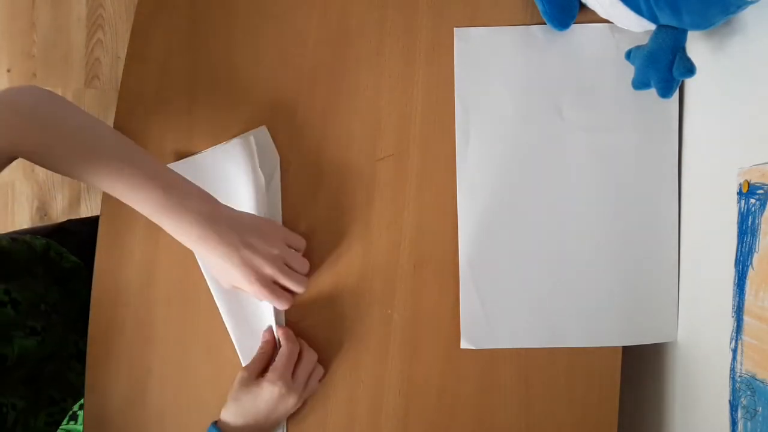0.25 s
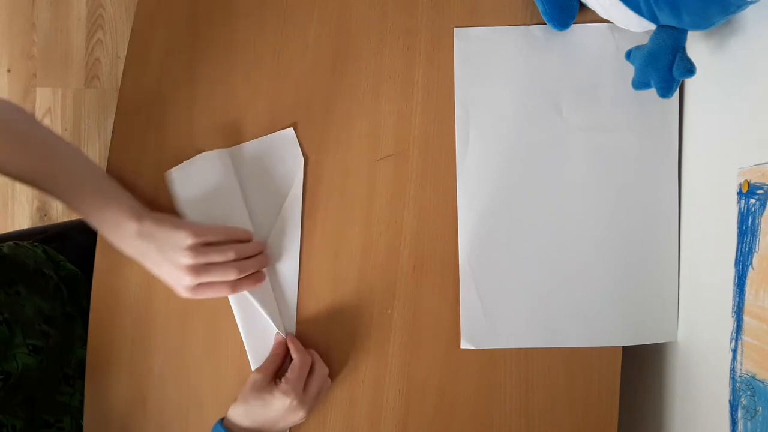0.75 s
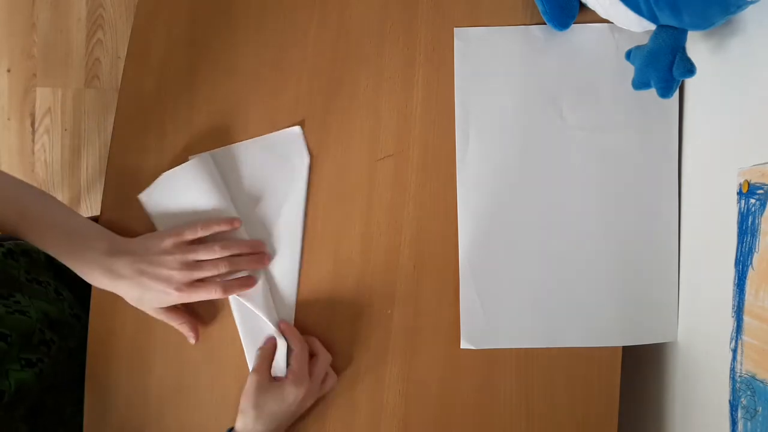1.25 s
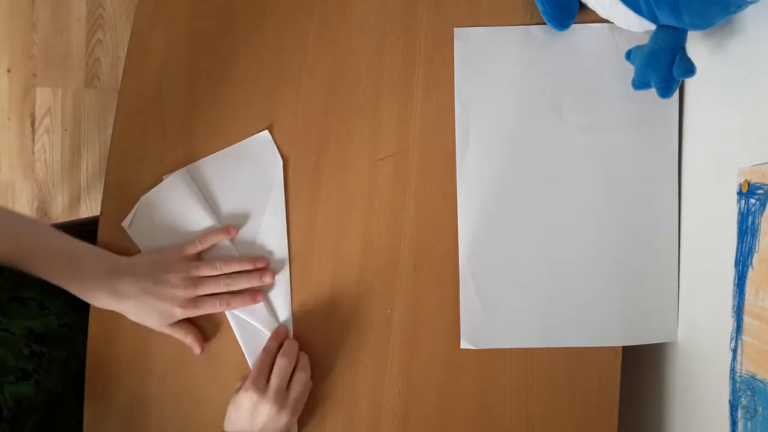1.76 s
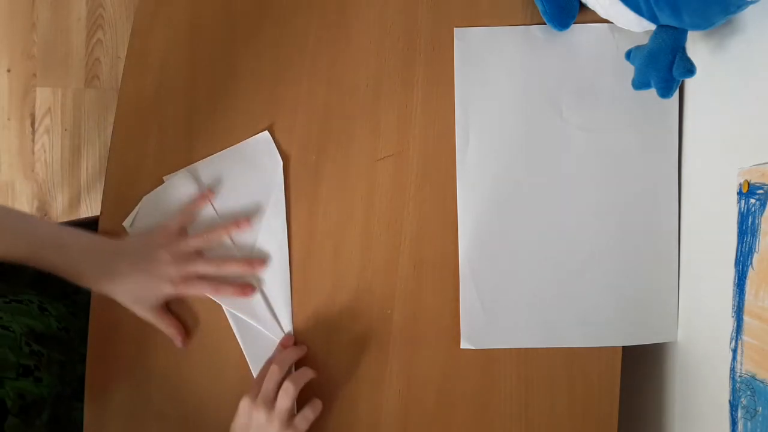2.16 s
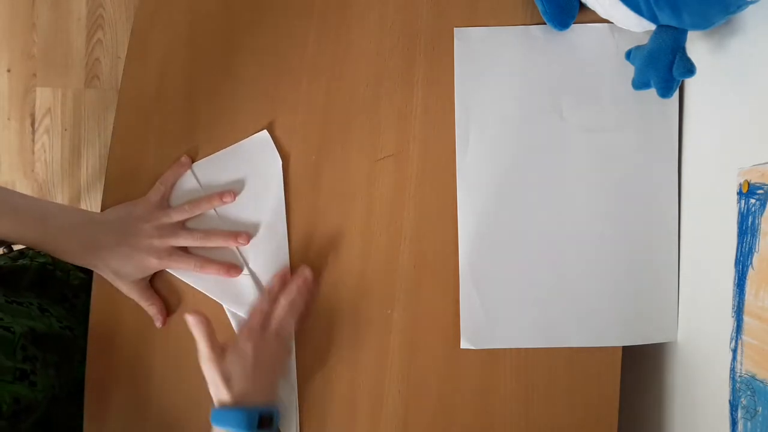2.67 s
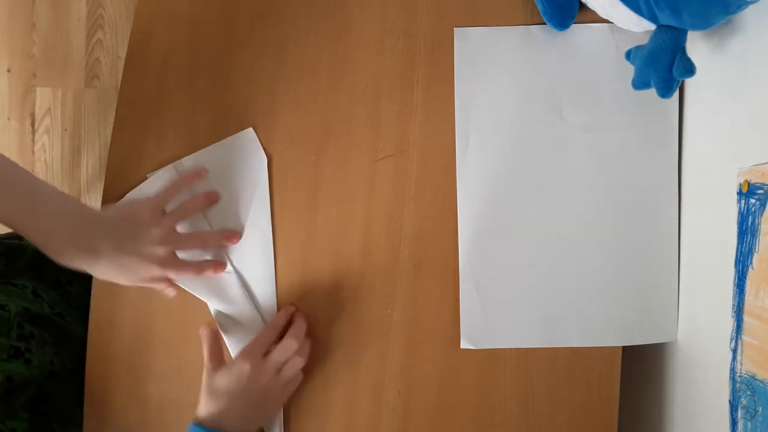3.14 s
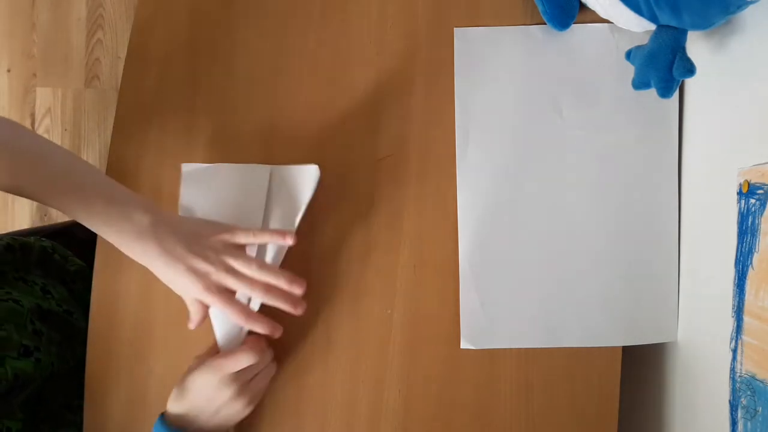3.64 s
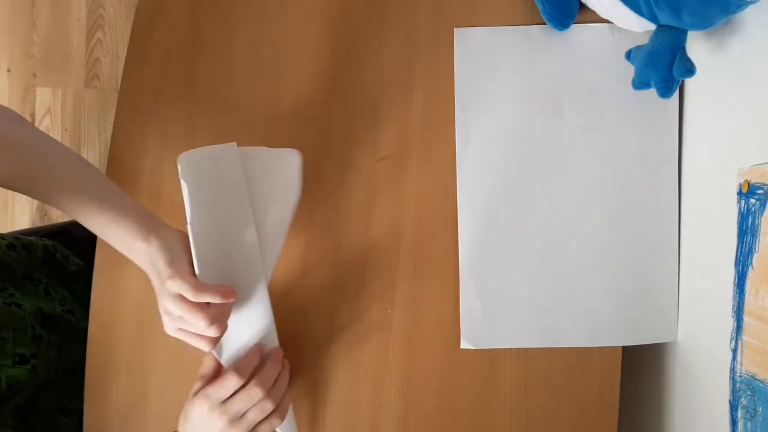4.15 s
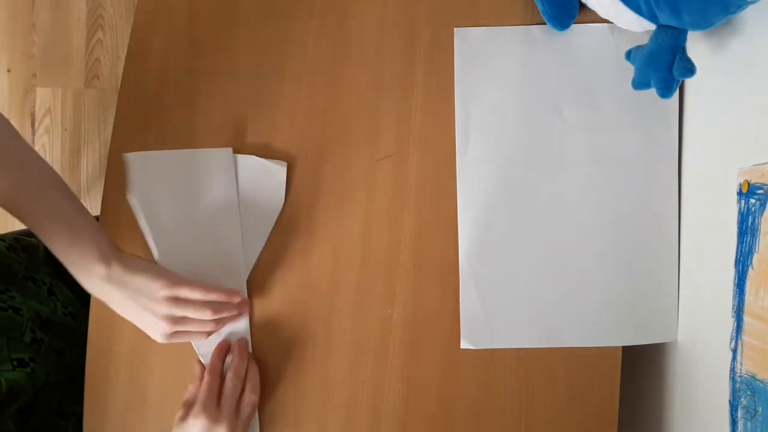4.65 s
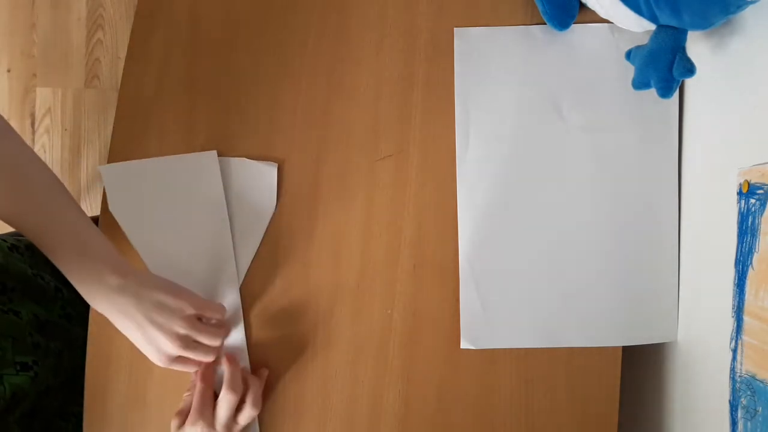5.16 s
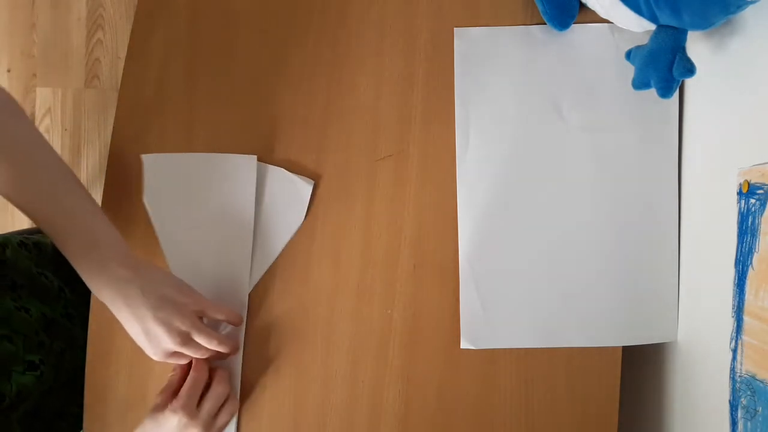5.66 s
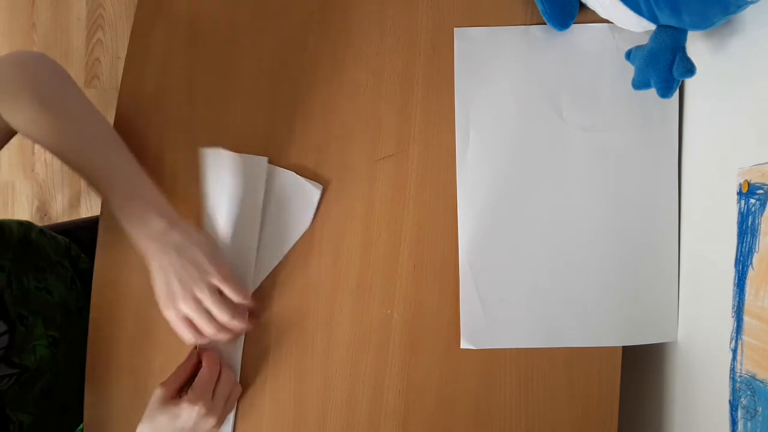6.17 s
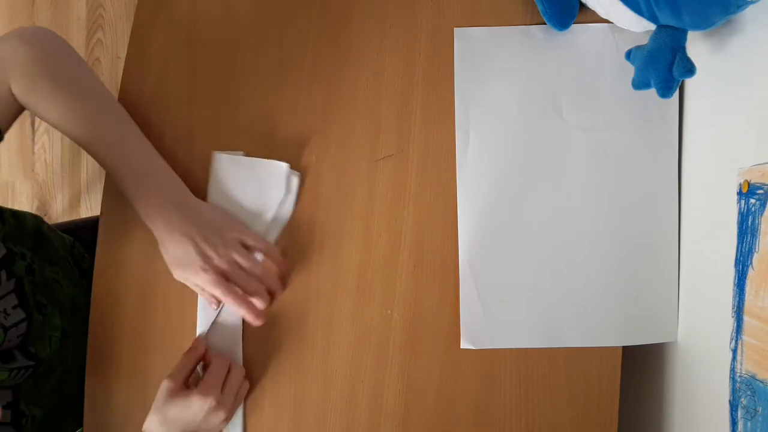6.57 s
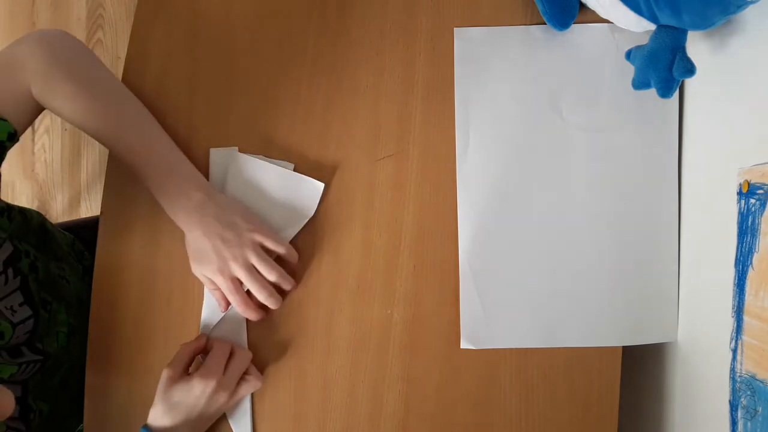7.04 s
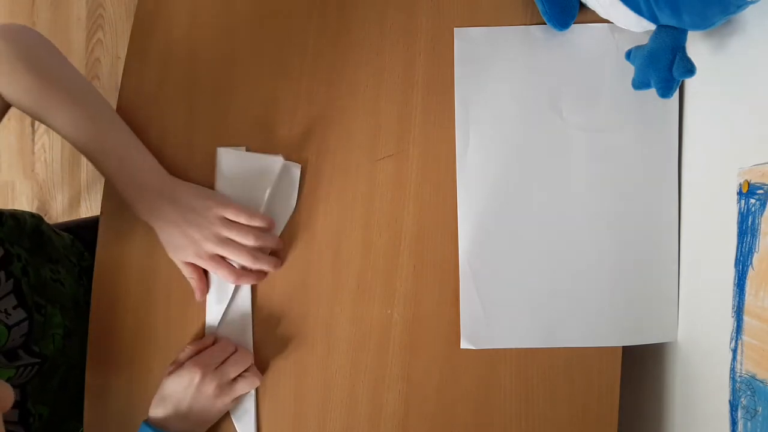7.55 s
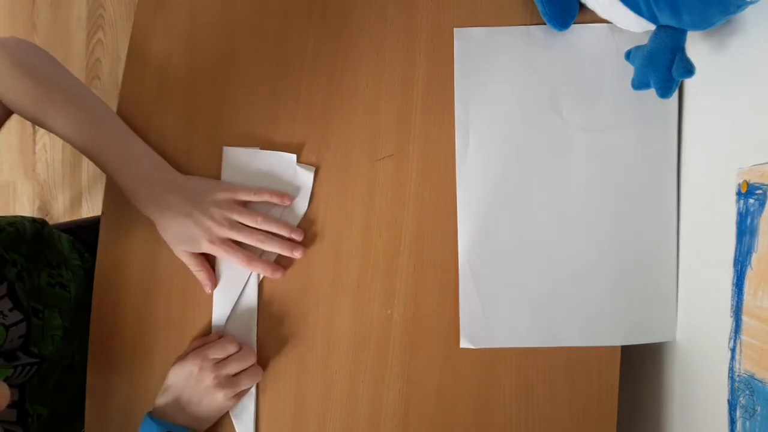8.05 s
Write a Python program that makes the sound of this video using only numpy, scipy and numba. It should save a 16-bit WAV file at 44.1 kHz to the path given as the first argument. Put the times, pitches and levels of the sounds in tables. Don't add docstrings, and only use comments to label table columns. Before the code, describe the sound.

Close paper rustling and creasing: fingers hiss along folds, stiff paper pops and crackles, and hands bump a tabletop in a small room.

```python
import sys
import numpy as np
from scipy import signal
from scipy.fft import rfft, irfft
from scipy.io import wavfile
from scipy.ndimage import uniform_filter1d
from numba import njit

SR = 44100
rng = np.random.default_rng(int(sys.argv[2]) if len(sys.argv) > 2 else 0)


def decibels_to_gain(level_db):
    exponent = np.asarray(level_db, float) / 20
    return 10 ** exponent


def log_audio(samples):
    frames = np.atleast_2d(samples).T
    limited = np.clip(frames, -1, 1)
    pcm = np.round(limited * 32767).astype(np.int16)
    wavfile.write(sys.argv[1], SR, pcm)


N = 366471


def band(x, lo_hz, hi_hz, order=2):
    edges = [lo_hz, min(hi_hz, SR / 2.1)]
    return signal.sosfilt(signal.butter(order, edges, "bandpass", fs=SR, output="sos"), x)


def resonate(x, modes):
    for hz, width_hz, db in modes:
        peak = signal.lfilter(*signal.iirpeak(hz, hz / width_hz, fs=SR), x)
        x = x + (decibels_to_gain(db) - 1) * peak
    return x


@njit
def moving_resonance(x, hz, sharp):
    y, b, l = np.empty(len(x)), 0., 0.
    for i in range(len(x)):
        g = np.tan(np.pi * hz[i] / SR)
        v = (b + g * (x[i] - l)) / (1 + g * (g + 1 / sharp))
        b, l, y[i] = 2 * v - b, l + 2 * g * v, v / sharp
    return y


def ring_each(pushes, hz, sharp):
    pairs = zip(pushes, hz[:, 0])
    return np.array([moving_resonance(row, np.full(len(row), f), sharp) for row, f in pairs])


def unit(x):
    return x / np.sqrt(np.mean(x ** 2))


def peak_unit(x):
    return x / np.abs(x).max(axis=1, keepdims=True)


def walk(rate):
    k = int(SR / rate)
    held = np.repeat(rng.standard_normal(N // k + 1), k)
    return unit(uniform_filter1d(held, k)[:N])


def place(times, shapes):
    out = np.zeros(N + shapes.shape[1])
    for s, shape in zip(times, shapes):
        start = int(s * SR)
        out[start:start + len(shape)] += shape
    return out[:N]


def push_times(s):
    return np.arange(768) * 1000 / SR + 0 * s


def curves(rows):
    s, *columns = np.transpose(rows)
    return [np.interp(np.arange(N) / SR, s, c) for c in columns]


def swells(rows, rest_db, shape=1.365):
    t = np.arange(0, N + 64, 64) / SR
    s, rise, fall, db = np.transpose(rows)[:, :, None]
    before = (s - t) / np.maximum(rise, .003)
    after = (t - s) / np.maximum(fall, .003)
    away = np.where(t < s, before, after)
    power = decibels_to_gain(2 * rest_db) + decibels_to_gain(2 * (db - 20 * away ** shape)).sum(axis=0)
    return np.interp(np.arange(N) / SR, t, 10 * np.log10(power))


# f/Hz, level/dB per Hz
HOUSE_TONE = [
    (13, -6),
    (22, -12),
    (34, -8),
    (48, -2.5),
    (146, -3),
    (547, -29),
    (714, -43),
    (1200, -50),
    (1560, -48),
    (2640, -120),
]


def air():
    f = np.fft.rfftfreq(N, 1 / SR) + 1
    tone_hz, tone_db = np.transpose(HOUSE_TONE)
    db = np.interp(np.log(f), np.log(tone_hz), tone_db)
    hush = irfft(rfft(rng.standard_normal(N)) * decibels_to_gain(db), N)
    return unit(hush) * decibels_to_gain(-72 + 0.42 * walk(0.7))


# t/s, f/Hz, level/dB
ENGINE_RUN = [
    (0, 45, -95),
    (1.1, 44.6, -86),
    (1.8, 58, -74),
    (2.5, 66, -74),
    (3.1, 59.6, -87),
    (8.31, 55, -101),
]


def engine():
    hz, db = curves(ENGINE_RUN)
    return unit(moving_resonance(rng.standard_normal(N), hz, 6.0)) * decibels_to_gain(db)


# delay/ms, level/dB
WALL_ECHOES = [
    (3.5, -17.0),
    (9.3, -19.0),
    (12.0, -18.0),
    (17.3, -20.0),
    (26.0, -22.0),
]
# f/Hz, width/Hz, level/dB
FURNITURE = [
    (705, 38, 3),
    (1020, 74, 3),
    (1336, 60, 3),
    (1610, 53, 3.5),
    (1960, 90, 6),
    (2850, 370, 3),
]


def room(x):
    low_t60_s, treble_t60_s, tail_db = .25, .26, -1.5
    step = int(.12 * SR)
    t = np.arange(int(SR / 3)) / SR
    pieces = np.pad(x, (0, -N % step)).reshape(-1, step)
    noise = rng.standard_normal((len(pieces), len(t)))
    low = band(noise, 67, 3600, order=1)
    tail = low * decibels_to_gain(-60 * t / low_t60_s) + (noise - low) * decibels_to_gain(-60 * t / treble_t60_s)
    tail = resonate(tail * (1 - np.exp(-t / 0.0011)), FURNITURE)
    tail = tail * decibels_to_gain(tail_db) / np.sqrt(np.sum(tail ** 2, axis=1, keepdims=True))
    delays_s = [ms / 1000 for ms, _ in WALL_ECHOES]
    tail = tail + place(delays_s, decibels_to_gain(np.array(WALL_ECHOES)[:, 1:]))[:len(t)]
    starts_s = (np.arange(len(pieces)) * step + .5) / SR
    return place(starts_s, signal.fftconvolve(pieces, tail, axes=1))


# t/s (strongest), rise/s, fall/s, level/dB
PALM_DRAGS = [(.57, .5, 0.18, -62.5), (.87, 0.1, 0.08, -51), (1.02, 0.062, 0.077, -57),
              (1.6, 0.044, 0.19, -58.5), (1.87, 0.044, .5, -63), (2.41, 0.019, 0.62, -61),
              (3.05, 0.55, 0.93, -61.5), (3.42, 0.14, 0.21, -51), (3.82, 0.58, 0.16, -57.5),
              (4.28, 0.13, 0.15, -53), (4.47, 0.015, 0.085, -50), (4.67, .04, 0.14, -59),
              (6.06, 0.14, 0.19, -60), (7.29, 0.023, 0.24, -56.5), (8.31, 0.12, .1, -68)]


def palm_rumble():
    level_db = swells(PALM_DRAGS, rest_db=-69.5)
    shaking = band(rng.standard_normal(N), 92, 530)
    rumble = unit(resonate(shaking, [(140, 60, 6.2), (204, 8.7, 5.1)]))
    return decibels_to_gain(level_db + 1.5 * walk(20)) * rumble


# t/s, peak level/dB, panel f/Hz, time to die by 60 dB/s
HAND_KNOCKS = [(1.593, -43, 193, 0.12), (2.41, -35, 189, 0.096), (3.398, -37.5, 99, 0.26),
               (0.845, -42, 253, 0.16), (3.762, -53, 272, 0.14), (4.466, -46, 149.4, 0.22),
               (4.499, -40, 140, 0.1), (4.581, -43, 292, 0.081), (4.66, -35.5, 215, 0.092),
               (7.288, -38, 397, 0.088), (7.54, -53, 400, .07), (1.4, -51.5, 100, 0.22),
               (2.11, -51, 104, 0.14), (2.769, -45, 300, .08), (4.921, -47.5, 192, 0.13),
               (5.408, -47, 131, 0.16), (8.16, -50, 269, 0.092)]


def knocks():
    s, peak_db, hz, t60 = np.transpose(HAND_KNOCKS)[:, :, None]
    t = np.arange(12000) / SR
    ring = np.sin(2 * np.pi * hz * t)
    ring = ring + 0.55 * np.sin(2 * np.pi * 0.69 * hz * t)
    ring = ring + 0.46 * np.sin(2 * np.pi * 1.46 * hz * t)
    fade = np.exp(-np.log(1000) * t / np.clip(t60, .03, .4))
    soft_start = 1 - np.exp(-t / 0.0061)
    return place(s[:, 0], decibels_to_gain(peak_db - 3.5) * ring * fade * soft_start)


def slips(rate, spread_db, smooth):
    sizes = decibels_to_gain(spread_db * np.minimum(rng.exponential(size=N), 3))
    clicks = (rng.random(N) < rate / SR) * sizes
    smear = np.exp(-np.arange(200) / (.0012 * SR))
    return rng.standard_normal(N) * (smooth + unit(np.convolve(clicks, smear)[:N]))


# t/s (strongest), rise/s, fall/s, level/dB
FLAP_WAVES = [(0, .1, 0.1, -61), (.5, 0.53, 0.24, -55.5), (.84, 0.15, 0.081, -48),
              (1.05, 0.36, 0.37, -60.5), (1.491, 0.69, .15, -61), (1.657, 0.16, 0.14, -63),
              (2.4, .01, 0.22, -60), (2.0, 0.23, 0.14, -61.5), (2.819, .25, 0.35, -66),
              (3.11, 0.086, 0.46, -61), (3.41, 0.12, 0.089, -47), (3.485, 0.096, 0.057, -37),
              (3.7, 0.4, 0.091, -52), (3.82, .08, 0.082, -42), (4.01, 0.012, 0.28, -61),
              (4.19, .01, .1, -46), (4.252, 0.077, 0.19, -44), (4.51, 0.33, 0.24, -60),
              (4.84, .05, 0.039, -53.5), (5.145, 0.025, 0.13, -58.5), (5.43, 0.2, 0.2, -65),
              (5.832, 0.0048, 0.06, -59), (6.05, 0.17, 0.12, -49.5), (6.397, 0.23, 0.12, -65),
              (7.07, .02, 0.24, -59.5), (7.532, 0.22, 0.063, -60), (8.31, .3, .1, -72)]
# f/Hz, width/Hz, level/dB
UNDER_SHEET = [
    (1600, 120, 14),
    (1020, 180, 8.5),
    (718, 10, 14),
]


def waving_flaps():
    level_db = swells(FLAP_WAVES, rest_db=-71.5)
    rub = band(slips(rate=130, spread_db=4.0, smooth=1.3), 450, 1410, order=3)
    return unit(resonate(rub, UNDER_SHEET)) * decibels_to_gain(level_db + walk(47) - 4.5)


# t/s (fastest), rise/s, fall/s, hiss level/dB, drag against hiss/dB
CREASE_SWEEPS = [(.235, 0.183, 0.15, -51, -16), (.449, 0.23, 0.2, -43, -5), (.84, 0.23, 0.2, -50.5, -1),
                 (1.073, 0.18, 0.25, -47, -1.5), (1.359, 0.29, 0.4, -50, -14),
                 (1.491, 0.37, 0.098, -45.5, -2.5), (2.0, 0.12, 0.1, -33.5, -14),
                 (2.57, 0.11, 0.046, -49, -9), (2.819, 0.13, 0.22, -49.5, -7),
                 (3.109, 0.02, 0.029, -34.5, -26), (3.454, 0.4, 0.38, -43, -4),
                 (3.856, 0.31, 0.067, -47.5, -2.5), (4.252, 0.075, 0.3, -43.5, -4),
                 (4.386, 0.31, 0.15, -53.5, -4), (4.83, 0.13, 0.033, -50.5, -2),
                 (5.008, 0.132, 0.38, -55, -1), (5.476, 0.26, 0.4, -62, 1), (6.0, 0.054, 0.15, -43.5, -7),
                 (6.114, 0.21, 0.028, -49, 2), (6.397, 0.18, 0.25, -49.5, -0.5),
                 (6.993, 0.27, 0.16, -52.5, -4.5), (7.49, 0.08, 0.12, -49, -6),
                 (7.772, 0.099, 0.17, -59.5, -1), (8.065, 0.14, 0.095, -52, -3.5), (8.3, .04, .2, -61, 5)]
RIDGE_RASPS = [
    (0.25, 0.014, 0.025, -40.5, -11),
    (1.03, 0.012, 0.017, -41, -4),
    (1.12, .01, 0.019, -43.5, -10),
    (1.217, .01, .02, -44.5, -5),
    (2.236, 0.013, 0.012, -46, -12.5),
    (3.598, .012, 0.011, -31, -9),
    (3.771, .006, 0.014, -30, 6.5),
    (3.112, 0.0063, 0.0084, -27, -6),
    (5.522, 0.0086, 0.027, -48.5, -8),
    (5.185, .06, .04, -58, 14),
]
# t/s, fall/s, hiss level/dB, drag against hiss/dB
LANDINGS = [(0, 0.09, -45, -7.5), (0.096, 0.17, -56, 2.5), (0.348, 0.18, -48, -1.5), (.6, 0.26, -65, 6.5),
            (0.747, 0.2, -44, -16), (.958, 0.085, -50, -2.5), (1.6, 0.14, -63, 9), (1.791, 0.36, -50, -5.5),
            (2.06, 0.1, -42.5, -6), (2.397, 0.35, -50, -6), (3.12, 0.11, -44, -15), (4.012, 0.27, -52.5, 0),
            (4.615, 0.36, -56.5, 1.5), (5.143, 0.12, -56.5, 10), (5.363, 0.3, -56.5, -0.5),
            (5.752, 0.044, -58, -14), (5.862, 0.16, -53.5, -1.5), (6.245, 0.32, -51.5, -3.5),
            (6.606, 0.17, -53.5, -1.5), (7.07, 0.87, -52.5, 0), (7.434, 0.11, -46, -0.5),
            (7.64, 0.15, -61, 2.5), (7.94, 0.29, -64.5, 1), (8.24, .1, -56, -2), (2.99, 0.2, -54, -10)]


def finger_level(share):
    sweeps = [(s, rise, fall, db + share * drag)
              for s, rise, fall, db, drag in CREASE_SWEEPS + RIDGE_RASPS]
    landing_s = 0.008
    landings = [(s, landing_s, fall, db + share * drag) for s, fall, db, drag in LANDINGS]
    sweep_db = swells(sweeps, rest_db=-80)
    landing_db = swells(landings, rest_db=-80, shape=2.1)
    return 10 * np.log10(decibels_to_gain(2 * sweep_db) + decibels_to_gain(2 * landing_db))


def skin_hiss():
    level_db = finger_level(0)
    hiss = band(slips(rate=400, spread_db=2.2, smooth=2.6), 4500, 20000, order=3)
    brighter_db = np.clip(0.17 * (level_db + 58), -5, 5)
    hiss = hiss + (decibels_to_gain(brighter_db) - 1) * band(hiss, 9100, 16000)
    return unit(hiss) * decibels_to_gain(level_db - 6.5)


# t/s, f/Hz, strength level/dB
AIR_POCKET = [(0, 2280, -36), (.3, 1880, 6), (.7, 1650, -2.5), (1.5, 1900, 0), (1.9, 2830, -15),
              (2.7, 1970, -6), (3.2, 2960, -19), (3.45, 1980, 4), (3.8, 2440, -19), (4.1, 2950, 1),
              (4.3, 1600, -1), (4.95, 1620, 6.5), (5.25, 1600, 10.5), (5.8, 2040, -7), (6.7, 1800, -4),
              (7.27, 1870, 1), (7.45, 3130, -2), (8.31, 1750, -23)]


def sheet_drag():
    level_db = finger_level(1.0)
    pocket_hz, pocket_db = curves(AIR_POCKET)
    drag = band(slips(rate=210, spread_db=6.0, smooth=3.7), 1460, 4360, order=3)
    pocket = decibels_to_gain(pocket_db) * moving_resonance(drag, pocket_hz, 7.2)
    sheet = (drag + pocket) / np.sqrt(1 + 0.14 * decibels_to_gain(2 * pocket_db))
    return unit(sheet) * decibels_to_gain(level_db + walk(37) - 4.0)


def sliding():
    catch_db = 1.18 * walk(30) + 1.08 * walk(140)
    return decibels_to_gain(catch_db) * (skin_hiss() + sheet_drag() + waving_flaps())


# t/s, peak level/dB, f/Hz
FLAP_THUDS = [(0.313, -50.5, 606), (0.6, -35.5, 960), (0.77, -24.5, 1020), (1.018, -39.5, 1020),
              (1.106, -48, 853), (1.271, -44.5, 1000), (1.37, -48, 1090), (1.434, -43.5, 1130),
              (1.551, -45, 1250), (1.597, -32, 1330), (1.624, -47, 1035), (2.399, -48, 1240),
              (2.476, -44, 1000), (2.769, -46, 1210), (2.793, -46, 720), (3.033, -45, 1020),
              (3.068, -48, 587), (3.111, -40, 1250), (3.26, -45.5, 993), (3.3, -41, 1160),
              (3.351, -43, 896), (3.376, -49, 1090), (3.406, -34, 754), (3.45, -27.5, 1150),
              (3.597, -38.5, 910), (3.671, -44, 888), (3.695, -38, 1160), (3.766, -25.5, 1020),
              (3.885, -47, 996), (3.933, -44.5, 712), (4.008, -50, 595), (4.062, -43, 910),
              (4.181, -41, 985), (4.221, -33.5, 990), (4.255, -38.5, 1040), (4.369, -46, 999),
              (4.465, -37, 900), (4.587, -44.5, 1010), (4.959, -43.5, 1290), (5.015, -50, 592),
              (5.42, -49, 1030), (5.513, -51.5, 748), (5.831, -51, 705), (6.046, -41, 1070),
              (6.067, -29, 1210), (6.369, -31, 1330), (6.812, -39, 1140), (7.048, -56, 1180),
              (7.282, -45, 690), (7.52, -40.5, 735), (7.542, -37.5, 1160), (8.036, -48, 1090),
              (8.209, -45.5, 1230), (8.279, -49, 1210)]


def thuds():
    s, peak_db, hz = np.transpose(FLAP_THUDS)[:, :, None]
    ms = push_times(s)
    burst = rng.standard_normal(ms.shape) * np.exp(-(ms / 2.5) ** 2)
    click = 1. * (ms == 0)
    out = []
    for push, db in ((burst, 0.5), (click, 1.5)):
        ring = ring_each(band(push, 260, 1400), hz, sharp=3)
        out.append(place(s[:, 0], decibels_to_gain(peak_db + db) * peak_unit(ring)))
    return np.array(out)


def snap(push, ringing, sheet_db, crisp_db, flap_db, hz):
    body = band(push, 1200, 5000, order=3)
    ring = ring_each(body, hz, sharp=7.0)
    sheet = ringing * ring + decibels_to_gain(np.clip(crisp_db - sheet_db, -26, 0)) * body
    top = band(push, 4700, 14500)
    top_db = np.clip(0.25 * (crisp_db + 10), -12, 3)
    top = top + (decibels_to_gain(top_db) - 1) * band(top, 10100, 17000)
    flap = band(push, 720, 1500)
    crisp_part = decibels_to_gain(crisp_db - 8.5) * peak_unit(top)
    sheet_part = decibels_to_gain(sheet_db - 2.72) * peak_unit(sheet)
    return crisp_part + sheet_part + decibels_to_gain(flap_db - 9.0) * peak_unit(flap)


POPS = [(0.771, -13.5, -9.5, 1580, 0.8), (0.3307, -49, -57, 4160, 8), (0.601, -30, -56, 1600, -7.5),
        (1.551, -41, -60, 1700, 5), (2.7695, -36, -30.5, 2960, 2), (3.4553, -26.5, -38, 1920, 4),
        (3.477, -25.5, -48, 2340, -4), (3.5990, -31, -28, 1900, 6.5), (3.697, -36, -65, 1160, -14),
        (3.759, -46, -51, 1970, 17), (3.935, -42.5, -71, 1310, -6), (4.007, -42.5, -49, 1410, -7),
        (4.062, -39, -34.5, 2470, 4.5), (4.181, -38, -41, 2140, 10), (4.2057, -28, -26, 1690, 4),
        (4.255, -32, -52, 1750, 1.5), (4.961, -40.5, -66, 1500, -0.5), (5.8306, -41, -46, 2660, 2),
        (7.064, -41, -73, 1840, -3), (7.522, -40, -42, 1270, -6), (7.5417, -27.5, -47, 1890, -8),
        (8.2097, -40.5, -49, 1750, -5), (8.0365, -34.5, -40, 1790, 0.5)]
SHEET_CRACKS = [(0.2442, -42, -41, 4830, 4), (0.094, -56, -39.5, 4480, 10), (1.2716, -26, -17.5, 1760, -3),
                (1.4359, -30.5, -32, 2120, -2.5), (2.2213, -51, -42, 4470, 5),
                (2.2302, -51, -39.5, 4500, 0), (2.4, -37, -37.5, 1930, 3.5),
                (2.7934, -27.5, -28.5, 1590, -1), (3.1113, -20.5, -13.5, 3830, -1.5),
                (3.26, -30.5, -27.5, 3320, 0), (3.3002, -33.5, -46, 3460, 4),
                (3.3512, -21.5, -36, 1710, -2.5), (3.406, -18.5, -21, 2040, 2.5),
                (3.7658, -21, -23.5, 2160, 7), (4.1914, -33, -41.5, 3040, 2), (4.2222, -23, -27, 3640, 1),
                (4.3363, -31.5, -49, 1380, -0.5), (4.5878, -41.5, -68, 1610, -2),
                (6.067, -19, -14, 2750, 1), (6.3692, -15.5, -12.5, 2350, -2), (6.8124, -27, -29, 1790, 2),
                (7.2819, -13, -6, 3530, 5), (4.907, -46.5, -54.5, 1600, -1.5),
                (8.123, -47.5, -41, 3030, 4.5), (8.2797, -36, -32, 1920, 3.5)]
CREASE_TICKS = [(0.209, -46, -43.5, 2700, 9), (0.9643, -39, -28, 4260, 2), (1.0088, -30.5, -27, 1820, -2),
                (1.024, -32.5, -53, 1690, -17), (1.214, -43, -46, 4320, 3), (1.4773, -27.5, -19, 2150, -6),
                (1.596, -11.5, -8, 2620, -1), (1.67, -33, -29.5, 1960, 1), (2.4253, -35, -57, 3830, -8),
                (2.477, -28.5, -30, 3330, 5.5), (2.723, -40.5, -35, 4780, 3), (3.0391, -36, -37, 3930, -4),
                (4.466, -26, -28, 2500, 3.5), (4.4973, -24, -26.5, 2380, 1.5),
                (4.917, -44.5, -38.5, 1866, -2), (5.421, -36.5, -38, 1880, 0), (5.516, -43, -44, 2850, 7),
                (5.6825, -36, -39.5, 2680, -2), (5.747, -41.5, -48, 1880, -2), (6.0476, -26, -23, 1920, 2),
                (6.283, -42, -38, 1850, 5), (6.317, -44, -36, 2080, 7.5), (7.3199, -18.5, -23, 2920, 0.5),
                (8.1653, -42.5, -36.5, 1850, 1)]
FURTHER_TICKS = [(0.1022, -57, -40, 3550, 3), (0.4945, -40, -40, 2980, 6), (0.606, -29, -55, 1660, -18),
                 (0.7527, -52, -40, 4500, 3), (0.992, -44, -41, 2510, -3), (1.2433, -41, -33, 2300, 4),
                 (1.0176, -32.5, -36, 1850, -6), (1.7933, -56, -51, 2990, 0), (2.3925, -45, -38, 3520, 0),
                 (0.7828, -24, -16, 3400, -3), (2.808, -37, -34, 4000, 0), (2.832, -43, -34.5, 4500, -3),
                 (2.963, -50, -46, 3500, 2), (3.033, -37.5, -37, 2520, -2), (3.346, -33.5, -47, 2000, 3),
                 (3.449, -35, -26, 4600, -5), (3.7700, -19, -21, 3780, 3.5), (4.3330, -37, -50, 1700, -5),
                 (4.2300, -26, -33, 3600, -4), (4.2398, -34, -30, 3650, -6), (4.2188, -30, -31, 3850, -4),
                 (4.5068, -36, -35, 2800, -4), (4.5138, -38, -33, 3180, -1), (4.489, -43, -30, 2500, -2),
                 (4.7503, -52, -50, 2500, -5), (5.1477, -48, -43, 1650, 0), (3.462, -28, -31, 2250, -4),
                 (3.4998, -38, -42, 2100, -9), (5.9609, -45, -42, 3000, 6), (6.063, -24.5, -31, 3800, 4),
                 (6.24, -55, -53, 3000, 0), (6.6067, -60, -44, 3000, 0), (7.1330, -41, -42, 2300, -3),
                 (7.2897, -20.5, -19, 3180, -4), (7.543, -33.5, -50, 2580, -5), (7.961, -50, -49, 2500, 7),
                 (8.2387, -56, -52, 2500, 0)]


def snaps():
    rows = POPS + SHEET_CRACKS + CREASE_TICKS + FURTHER_TICKS
    s, sheet_db, crisp_db, hz, room_db = np.transpose(rows)[:, :, None]
    counts = [len(POPS), len(SHEET_CRACKS), len(CREASE_TICKS + FURTHER_TICKS)]
    flap_db = sheet_db + np.repeat([-17, -13, -25.5], counts)[:, None]
    colour = crisp_db, flap_db, hz
    ms = push_times(s)
    burst = rng.standard_normal(ms.shape) * np.exp(-(ms / 1.71) ** 2)
    click = 1. * (ms == 0)
    near = snap(burst, 2.06, sheet_db + 2, *colour)
    far = snap(click, 0.75, sheet_db - 2, *colour) * decibels_to_gain(room_db + 8.5)
    return np.array([place(s[:, 0], near), place(s[:, 0], far)])


def scene():
    background = air() + engine()
    table = palm_rumble() + knocks()
    rub = sliding()
    near, far = snaps() + thuds()
    paper = rub + near + room(decibels_to_gain(-6.5) * rub + far)
    return (paper + table + background)[None]


def band_limit(x):
    return signal.sosfilt(signal.butter(12, 16400, fs=SR, output="sos"), x)


# f/Hz, width/Hz, level/dB
MIC_PORT = [
    (8067, 1133, 23),
    (3900, 5340, -3),
    (10820, 6400, -6.5),
    (15900, 980, 2),
]


def record(dry):
    ringing = resonate(dry, MIC_PORT)
    soft = signal.sosfilt(signal.butter(2, 9000, fs=SR, output="sos"), ringing)
    soft = soft + decibels_to_gain(-87.0) * band(rng.standard_normal(N), 1000, 18000, order=1)
    soft = signal.sosfilt(signal.ellip(8, .2, 60, 15480, fs=SR, output="sos"), soft)
    return band_limit(soft - .0006)


dry = scene()
out = record(dry)
log_audio(out)
```